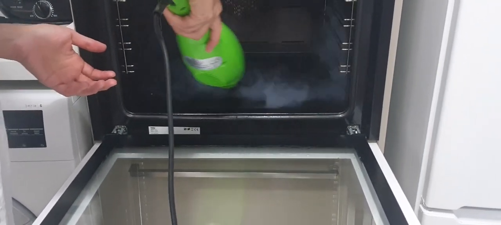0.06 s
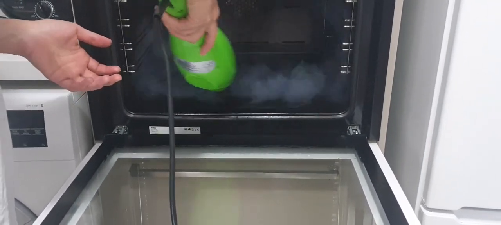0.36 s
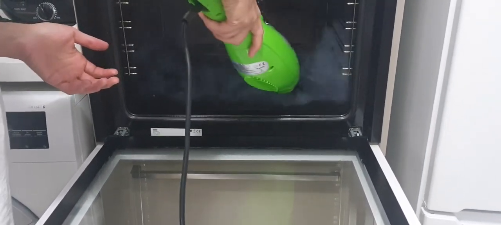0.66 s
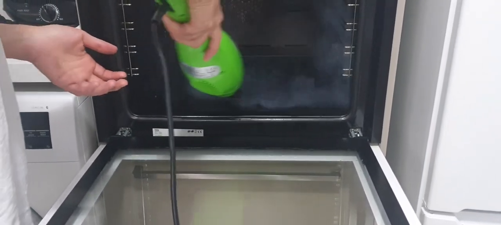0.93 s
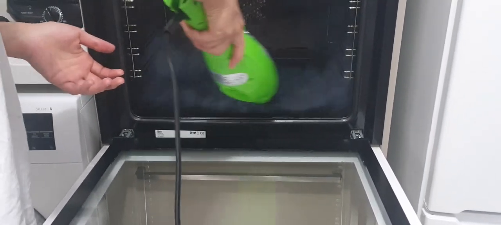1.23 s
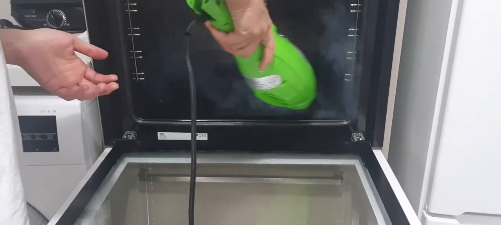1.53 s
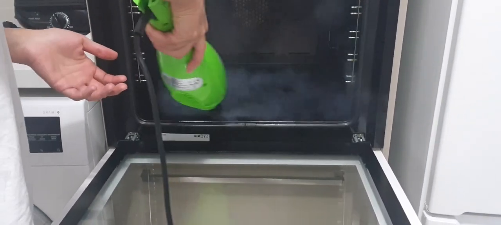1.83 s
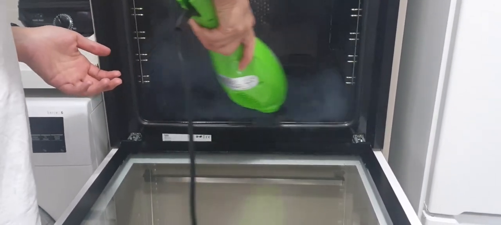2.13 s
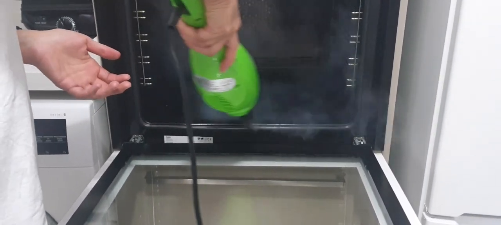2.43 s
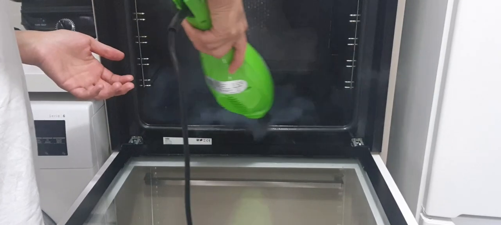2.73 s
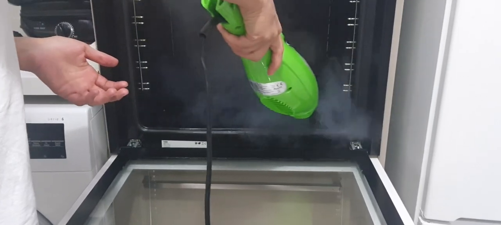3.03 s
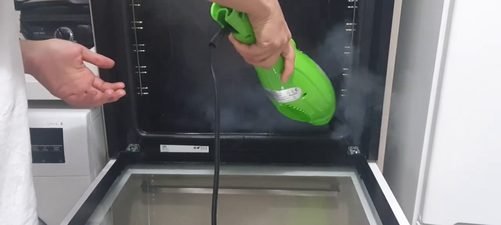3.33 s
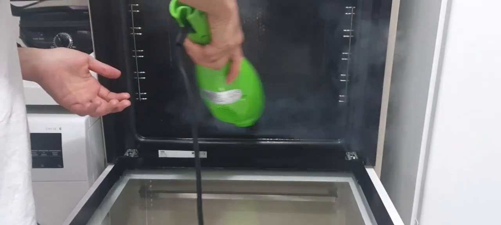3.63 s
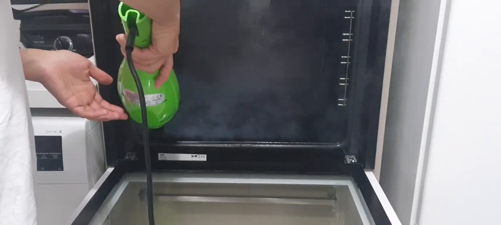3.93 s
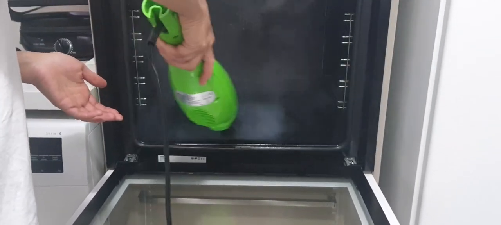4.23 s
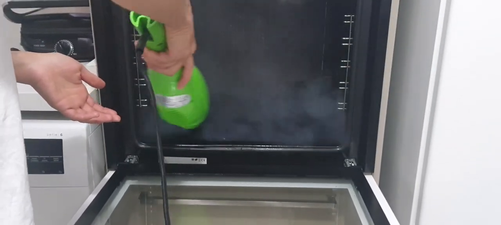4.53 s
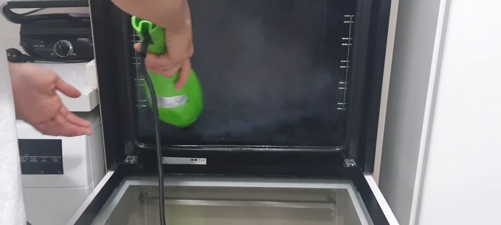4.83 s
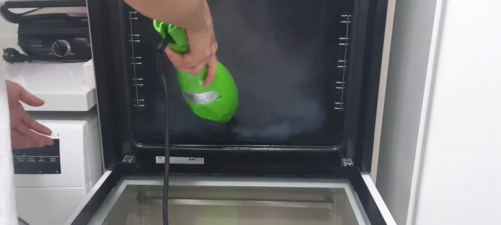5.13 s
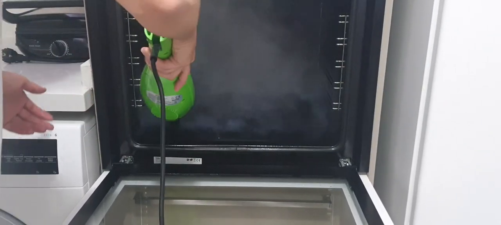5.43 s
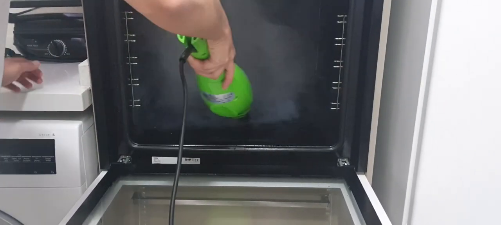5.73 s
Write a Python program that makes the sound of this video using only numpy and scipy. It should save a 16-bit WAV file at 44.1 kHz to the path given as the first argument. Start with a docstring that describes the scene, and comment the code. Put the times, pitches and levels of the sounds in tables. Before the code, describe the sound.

A handheld steam cleaner blows a steady, high hiss into an open oven in a small kitchen. The hiss swirls as the nozzle sweeps from side to side, with a fine sizzle of droplets. Now and then the jet chokes for an instant or makes the oven ring in a faint half whistle. The sound is louder and brighter on the right, where the microphone adds a faint low flutter and a few soft bumps, mostly late.

```python
"""A handheld steam cleaner hisses and spits fine droplets as it sweeps an open oven in a small kitchen.
Echoes off the enamel walls slide as the nozzle moves from side to side, so the hiss swirls.
Now and then the jet chokes on condensed water, or makes the oven ring near 3 kHz.
The right microphone hears it louder and brighter, and slightly rectifies the sizzle into a faint
low flutter. A few soft, low bumps sound on that side too."""
import sys
import numpy as np
from scipy import signal
from scipy.fft import rfft, irfft, next_fast_len
from scipy.io import wavfile
from scipy.ndimage import uniform_filter1d

SR = 44100
rng = np.random.default_rng(int(sys.argv[2]) if len(sys.argv) > 2 else 0)


def materialize(psi):
    """Save the field psi as 16-bit PCM at rate SR to the path in sys.argv[1].

    A 1-D psi becomes a single channel; in a 2-D psi each row is a channel.
    """
    bounded = np.clip(np.atleast_2d(psi).T, -1, 1)
    quanta = np.round(bounded * 32767).astype(np.int16)
    wavfile.write(sys.argv[1], SR, quanta)


N = 258867


def from_db(db):
    """Decibels to gain."""
    return 10 ** (np.asarray(db) / 20)


def unit_rms(x):
    """Scale to unit power."""
    return x / np.sqrt(np.mean(x ** 2) + 1e-20)


def automation(points):
    """Join (seconds, value) points into a value for every sample."""
    return np.interp(np.arange(N) / SR, *np.transpose(points))


def bin_hz():
    """Frequencies of the padded spectrum that the EQ works on."""
    return np.maximum(np.fft.rfftfreq(2 * next_fast_len(N // 2 + 4096, True), 1 / SR), 1)


def eq(x, gain):
    """Filter by a gain for each frequency."""
    size = 2 * (len(bin_hz()) - 1)
    return irfft(rfft(x, size) * gain, size)[..., :N]


def eq_curve_db(points):
    """Join (Hz, dB) points on a log-frequency axis."""
    hz, db = np.transpose(points)
    return np.interp(np.log(bin_hz()), np.log(hz), db)


def drift(rate_hz):
    """Smooth random modulation with a spread of 1."""
    hop = 40
    pole = np.exp(-2 * np.pi * rate_hz * hop / SR)
    slow = signal.lfilter([1], [1, -2 * pole, pole * pole], rng.standard_normal(N // hop + 2002))[2000:]
    return np.interp(np.arange(N) / hop, np.arange(len(slow)), unit_rms(slow))


def swell(at_s, width_s):
    """A smooth rise to 1 and back; the width is taken at half height."""
    return np.exp2(-np.minimum((2 * (np.arange(N) / SR - at_s) / width_s) ** 2, 40))


def steam(left_follow, waver_db, wander_db, sputter_db):
    """Roar, hiss and sizzle swell with the aim; wet steam makes the highs choke and sputter most."""
    # Tone of the steam. Each row: frequency in Hz, noise density in dB.
    steam_tone = [(30, -91), (80, -80), (200, -83.5), (650, -80), (1300, -77.5), (2200, -70.5), (3000, -62),
                  (3800, -62), (6400, -67), (8500, -65.5), (11000, -64), (13300, -65.5), (14200, -70.5),
                  (16000, -69)]
    # Resonances of the oven's cavity and panels. Each row: centre in Hz, width in Hz, boost in dB.
    oven_modes = [(311, 50, 5), (460, 114, 8.5), (1110, 26, 2), (1528, 62, 5), (2570, 100, 2.5),
                  (3080, 640, 2)]
    # Slow rides of the roar on the wall, the mid hiss and the sizzle at the nozzle.
    # Each row: time in seconds, level in dB.
    roar_ride = [(0, -3), (.13, 0), (.42, -0.5), (.72, -0.6), (1.3, 2), (1.42, -0.6), (2.03, 0.5),
                 (2.22, -1.5), (2.55, 0), (3.18, -1.5), (3.68, 0.1), (4.1, -.5), (4.52, .7), (4.76, -2),
                 (5.2, 0.4), (5.87, -1.2)]
    hiss_ride = [(0, -1.5), (.24, 2.7), (.75, 0.6), (1.4, 0.2), (1.83, 2.5), (2.15, 0.6), (2.7, 1),
                 (2.97, -2), (3.5, 0), (4.2, 1.5), (5.15, -0.5), (5.87, -0.9)]
    sizzle_ride = [(0, -2.5), (.4, 0.5), (.85, 0.3), (1.2, 1.2), (2.15, 1.5), (2.25, -0.5), (2.65, 1),
                   (3.17, 1), (3.27, -3.5), (3.42, -2), (3.6, 1), (4.7, 0.5), (5.3, -1.3), (5.87, -0.6)]
    # The top of the sizzle sharpens briefly. Each row: time in seconds, boost in dB.
    sharpenings = [(.28, 2), (.55, 0.5), (1.35, 2.5), (1.8, 0.5), (2.32, 2), (2.88, 2), (4.83, 4),
                   (5.22, 4)]
    # Roar, hiss, sizzle and top sizzle beam in different directions. Each entry: centre in Hz,
    # level in dB, gain in dB per metre the nozzle moves right, share of a choke, share of the sputter.
    bands = {"roar": (3500, -1.14, 0, 0.38, .4), "hiss": (5900, 0, -8.5, 0.2, 0.41),
             "sizzle": (12100, -0.84, -5, 1, 1), "top sizzle": (13900, 1.2, 18, 0.71, 0.92)}
    hz = bin_hz()
    modes_db = sum(db / (1 + (2 * (hz - centre) / width) ** 2) for centre, width, db in oven_modes)
    tone = from_db(eq_curve_db(steam_tone) + modes_db) * np.sqrt(SR / 2)   # white noise spans SR / 2 Hz
    jet = eq(turbulence(crossover_hz=1860, low_likeness=0.39), tone)
    follow = np.array([[left_follow], [1]])   # the left side hears mostly the steadier reflected sound
    sputter = sputter_db * (drift(39) + 0.76 * drift(43))
    rides_db = [automation(ride) for ride in (roar_ride, hiss_ride, sizzle_ride)]
    top_db = rides_db[-1] + sum(db * swell(at_s, width_s=0.076) for at_s, db in sharpenings)
    nozzle_m, dip_db = nozzle_position(), choke_db()
    log_centres = np.log([band[0] for band in bands.values()])
    out = 0
    for k, (band, ride_db) in enumerate(zip(bands.values(), rides_db + [top_db])):
        _, level_db, db_per_m, choke_share, sputter_share = band
        band_gain = np.interp(np.log(hz), log_centres, np.eye(len(bands))[k])
        flicker_db = sputter_share * sputter + waver_db * drift(14) + wander_db * drift(8.7)
        band_db = level_db + ride_db + db_per_m * nozzle_m - choke_share * dip_db + flicker_db
        out = out + eq(jet, band_gain) * from_db(follow * band_db)
    return out


def turbulence(crossover_hz, low_likeness):
    """The jet's noise and droplets in stereo: sliding oven echoes plus the kitchen's diffuse wash."""
    jet = rng.standard_normal(N) + from_db(-13) * droplets(per_s=160, spread_db=4.5)
    nozzle_m = nozzle_position()
    oven = np.array([wall_echoes(jet, nozzle_m, first_s=.0014, last_s=.02, fade_s=.018, count=9)
                     for side in range(2)])
    highs = unit_rms(oven + from_db(-13) * rng.standard_normal((2, N)))
    # long waves ring on between the kitchen walls and reach both sides partly alike
    shared, *own = [
        wall_echoes(rng.standard_normal(N), nozzle_m, first_s=.016, last_s=.08, fade_s=.049, count=5)
        for path in range(3)]
    lows = np.sqrt(low_likeness) * shared + np.sqrt(1 - low_likeness) * np.array(own)
    low_share = 1 / (1 + (bin_hz() / crossover_hz) ** 6)
    return eq(highs, np.sqrt(1 - low_share)) + eq(lows, np.sqrt(low_share))


def droplets(per_s, spread_db):
    """Condensed water leaves the nozzle as tiny ticks of uneven size, in clumps."""
    ticks = rng.random(N) < per_s * from_db(4 * drift(5)) / SR
    sizes = from_db(spread_db * np.minimum(rng.exponential(1, N), 3))
    return unit_rms(ticks * sizes * rng.choice([-1, 1], N))


def nozzle_position():
    """The hand sweeps the nozzle from side to side, turning smoothly."""
    # The hand's path. Each row: time in seconds, distance right of the oven's centre in metres.
    sweep = [(0, -0.033), (.25, -0.079), (.75, 0.026), (1.0, -0.089), (1.5, 0.089), (1.87, -0.075),
             (2.25, 0.043), (2.5, -0.058), (3.25, 0.073), (4.0, -0.14), (4.25, -0.05), (4.75, -0.18),
             (5.0, -0.04), (5.5, -0.13), (5.87, -0.011)]
    return uniform_filter1d(automation(sweep), size=6000)


def wall_echoes(source, nozzle_m, first_s, last_s, fade_s, count):
    """Each echo path grows or shrinks as the nozzle sweeps and trembles, so the interference slides."""
    oversample, sound_m_per_s, tremble_m = 8, 343, .016
    fine = signal.resample_poly(source, oversample, 1)
    out = np.zeros(N)
    for delay_s in np.geomspace(first_s, last_s, count) * rng.uniform(.85, 1.15, count):
        extra_m = nozzle_m * np.cos(rng.uniform(0, 2 * np.pi)) + tremble_m * drift(1.23)
        lag = (delay_s + extra_m / sound_m_per_s) * SR
        read_at = np.rint(oversample * (np.arange(N) - lag)).astype(int)
        out += np.exp(-delay_s / fade_s) * rng.choice([-1, 1]) * fine.take(read_at, mode="wrap")
    return unit_rms(out)


def mic_flutter(hiss, rectified_share, uneven_db):
    """The microphone squares a little of the loud hiss into a low rumble that ducks as the jet chokes."""
    # Tone of the flutter. Each row: frequency in Hz, relative level in dB.
    flutter_tone = [(15, -48), (30, -34), (52, -5), (75, -2.5), (130, -5.5), (200, -13.5), (500, -12.5),
                    (2000, -70)]
    # Slow ride of the flutter. Each row: time in seconds, level in dB.
    flutter_ride = [(0, -50), (.35, -46), (.63, -42.5), (1.1, -46.5), (1.65, -44.5), (1.8, -45.5),
                    (2.35, -41.5), (2.62, -43.5), (3.17, -42), (3.3, -59), (3.47, -56), (3.58, -42.5),
                    (4.4, -46.5), (4.72, -43.5), (5.25, -50), (5.36, -60), (5.65, -54), (5.87, -46)]
    tone = from_db(eq_curve_db(flutter_tone))
    rectified = unit_rms(eq(hiss ** 2 - uniform_filter1d(hiss ** 2, size=2000), tone))
    air = unit_rms(eq(rng.standard_normal(N), tone))
    rumble = np.sqrt(rectified_share) * rectified + np.sqrt(1 - rectified_share) * air
    level_db = automation(flutter_ride) - 1.8 * choke_db() + uneven_db * drift(16)
    return rumble * from_db(level_db)


def oven_ring(width_hz, left_db):
    """The cavity holds a narrow band of noise, half a whistle, that each side hears differently."""
    # The ring flares as the jet hits a wall squarely.
    # Each row: peak time in seconds, pitch in Hz, level in dB, length in seconds.
    flares = [(.14, 3300, -25, .08), (.29, 2980, -26, 0.18), (.42, 3170, -23, 0.05),
              (1.486, 3140, -28, 0.053), (2.043, 2910, -26, 0.054), (2.298, 3140, -27.5, 0.36),
              (2.996, 3130, -29, .12), (3.37, 3206, -22.5, .12), (3.66, 3160, -20.5, .08),
              (3.868, 3000, -26, .06), (4.214, 3050, -26, 0.067), (4.47, 2940, -25, 0.065),
              (4.558, 3015, -21, 0.034), (5.378, 3280, -23.5, 0.054), (5.784, 3126, -22.5, .07)]
    t = np.arange(N) / SR
    pole = np.exp(-np.pi * width_hz / SR)
    noise = rng.standard_normal((2, N)) + 1j * rng.standard_normal((2, N))
    narrow = signal.lfilter([1], [1, -2 * pole, pole * pole], noise)
    tones = np.zeros(N, complex)
    for at_s, hz, db, length_s in flares:
        near = np.abs(t - at_s) < 2 * length_s
        tones[near] += from_db(db) * swell(at_s, length_s)[near] * np.exp(2j * np.pi * hz * t[near])
    return (narrow * tones).real / narrow.real.std() * from_db([[left_db], [0]])


def choke_db():
    """Condensed water chokes the jet for an instant and ducks the sizzle."""
    # The chokes. Each row: time in seconds, depth of the dip in dB.
    chokes = [(.21, 2.5), (.45, 4.5), (.755, 4), (1.47, 4.5), (1.53, 6), (2.26, 3), (2.425, 4), (3.22, 3),
              (3.425, 3.5), (5.13, 3), (5.27, 1.5)]
    return sum(db * swell(at_s, width_s=0.04) for at_s, db in chokes)


def low_bumps(pitch_hz, rise_s):
    """Soft low bumps that die in about a cycle."""
    # The bumps. Each row: start in seconds, envelope peak in dB.
    hits = [(0.369, -34), (3.976, -29), (4.698, -27.5), (4.781, -28), (4.981, -27), (5.473, -30.5)]
    out = np.zeros(N)
    for start_s, db in hits:
        age_s = np.clip(np.arange(N) / SR - start_s, 0, .2)
        envelope = age_s / rise_s * np.exp(1 - age_s / rise_s)
        out += from_db(db) * envelope * np.sin(2 * np.pi * pitch_hz * age_s)
    return out


def scene():
    """Steam and the oven's ring in stereo, with the flutter and bumps on the right."""
    # Extra colour of the right microphone. Each row: frequency in Hz, gain in dB.
    right_tone = [(300, 6), (460, 1), (700, 5.5), (1550, 3), (2100, 4.5), (2600, 8), (3150, 9.5),
                  (3950, 1.5), (5000, 8.5), (6800, 15), (8200, 1), (9600, -0.5), (11200, 14.5),
                  (13000, 15.5), (15600, 11.5)]
    left, right = steam(left_follow=0.38, waver_db=0.69, wander_db=0.42, sputter_db=1.1)
    right = eq(right, from_db(eq_curve_db(right_tone)))
    flutter = mic_flutter(right, rectified_share=0.44, uneven_db=3.0)
    ring = oven_ring(width_hz=133, left_db=-10.5)
    bumps = low_bumps(pitch_hz=84, rise_s=0.0035)
    return np.array([left, right + flutter + bumps]) + ring


def record(dry):
    """Soft-clip the highest peaks, then cut the top with a steep low-pass."""
    ceiling, cutoff_hz = 1.05, 15750
    rounded = dry / (1 + (dry / ceiling) ** 8) ** (1 / 8)
    return eq(rounded, 1 / np.sqrt(1 + (bin_hz() / cutoff_hz) ** 500))


dry = scene()
out = record(dry)
materialize(out)
```